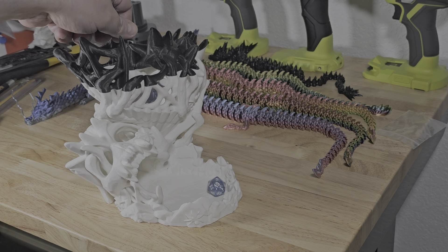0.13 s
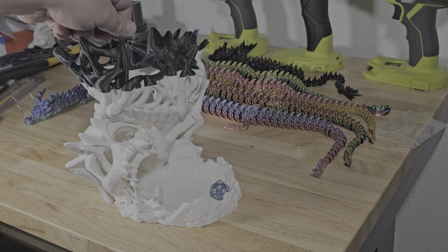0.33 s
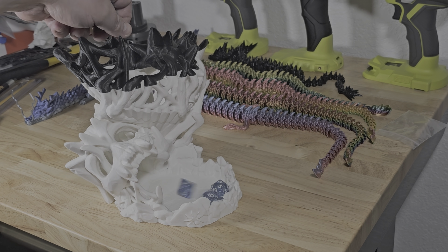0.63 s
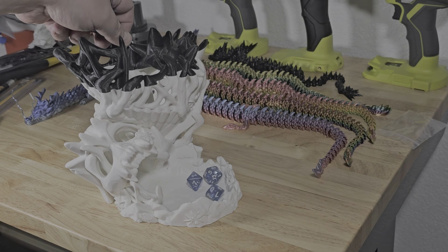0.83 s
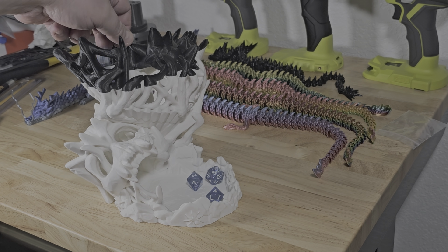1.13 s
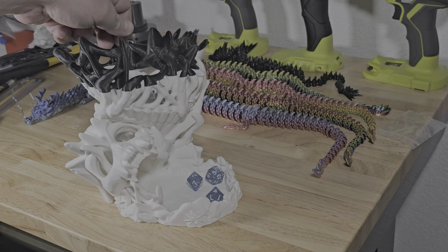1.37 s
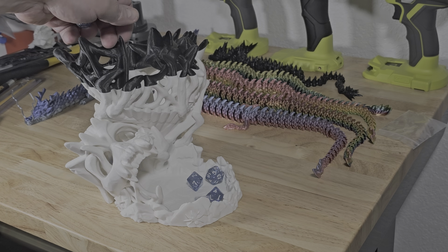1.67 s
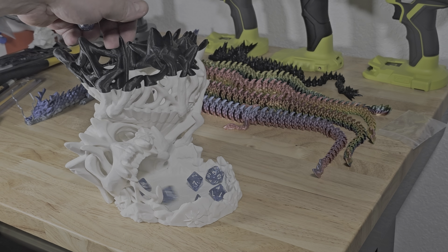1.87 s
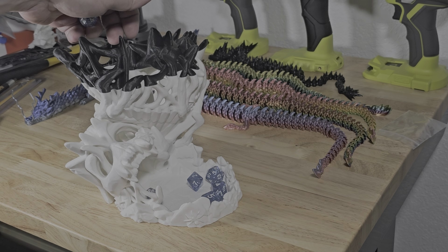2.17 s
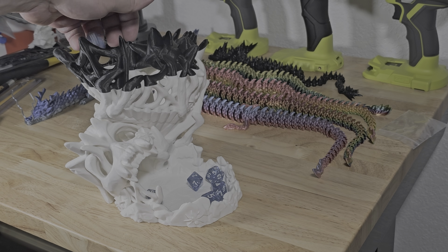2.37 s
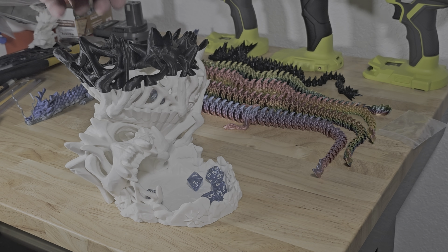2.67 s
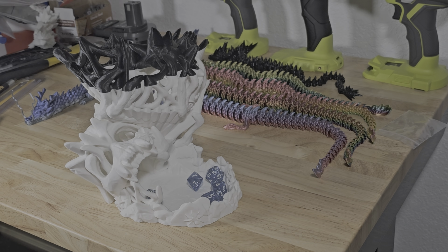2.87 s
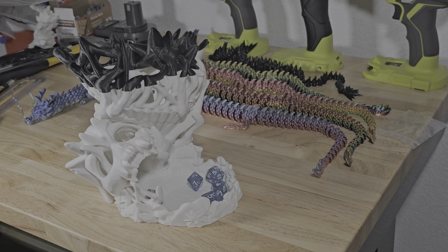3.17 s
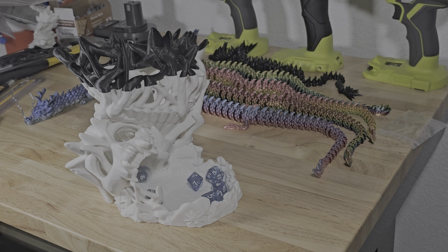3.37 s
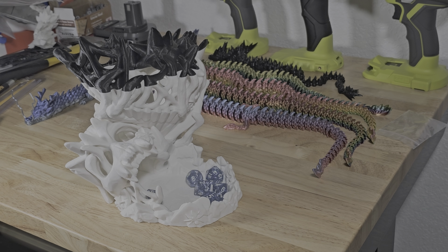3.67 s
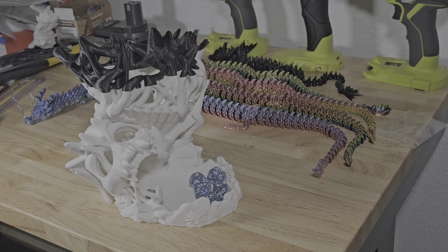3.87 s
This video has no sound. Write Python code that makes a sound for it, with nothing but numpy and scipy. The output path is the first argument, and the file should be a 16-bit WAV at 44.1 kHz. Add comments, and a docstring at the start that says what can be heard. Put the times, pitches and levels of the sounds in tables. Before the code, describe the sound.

Plastic dice tumble through a plastic tower: two dense rattles, then a sparser series of separate knocks that settles in the tray. Close stereo pickup, slight room echo, faint low hum.

```python
"""Dice tumbling down a tower

Hard plastic dice drop into a plastic tower on a workbench, three throws in a row, and roll out into the tray.
Each contact is a click plus short rings of the shell and longer rings of the tower, with a light rebound.
Faint touches and rolling edges are made the same way; heavy landings add a soft thump of the bench top.
Shaped noise and steady tones make a quiet, humming workshop, and decaying noise makes its echoes."""
import sys
import numpy as np
from scipy import signal
from scipy.fft import rfft, irfft
from scipy.io import wavfile
from scipy.ndimage import uniform_filter1d

SR = 44100
rng = np.random.default_rng(int(sys.argv[2]) if len(sys.argv) > 2 else 0)


def output_pcm(signal):
    """Save a mono or channel-first signal as 16-bit PCM at the path in sys.argv[1].

    Samples are clipped to [-1, 1] before scaling.
    """
    pcm = np.clip(np.atleast_2d(signal).T, -1, 1) * 32767
    wavfile.write(sys.argv[1], SR, np.round(pcm).astype(np.int16))


N = 176400

# Quiet air noise of the room, relative spectrum: pitch_hz, level_db (per Hz)
AIR_SPECTRUM = [(20, -37), (52, -7), (90, -14.5), (150, -12), (230, -11.5), (330, -18), (750, -19.5),
                (2200, -30), (2800, -31), (9000, -45), (15500, -57)]
# Low hum and faint high whine: pitch_hz, level_db
HUM_TONES = [(52, -54.5), (222, -59), (15014, -84)]
# Knocks of the dice: start_s, level_db, hollow_lows_db, hard_treble_db,
# ring_hz (of the struck spot), reflection_lag_ms (of the first reflection)
DICE_KNOCKS = [(0.002, -29, -1, -6, 1290, 0.3), (0.046, -28.5, 13, 5, 4320, 0.3),
               (0.1078, -24.5, -6, -11, 1550, 0.15), (0.1184, -19, -13.5, -5.5, 1260, 0.13),
               (0.1288, -18.5, -5, 4.5, 2160, 0.26), (0.1413, -20, -12, -3.5, 3220, 0.2),
               (0.1647, -28, -9, 2, 1320, 0.31), (0.1933, -28, 4, -3, 3100, 0.27),
               (0.2028, -25, -12, -6, 1200, 0.14), (0.2245, -21.5, -8, 0, 2090, 0.29),
               (0.2432, -21, -6.5, -5.5, 1670, 0.22), (0.2636, -22, 1, -14, 4200, 0.61),
               (0.2962, -24, -0.5, -6, 1640, 0.34), (0.3167, -25.5, 1, 2, 2500, 0.24),
               (0.3519, -15, -4, -3, 3700, 0.19), (0.4064, -16, -7, -11, 2570, 0.13),
               (0.429, -22, 3.5, 4, 1860, 0.25), (0.4779, -20, -4.5, 8, 3720, 0.45),
               (0.4896, -22, -0.5, -14, 2500, 0.66), (0.5246, -20, -8, -2, 2570, 0.2),
               (0.5579, -13.5, -2, -1, 3620, 0.17), (0.5743, -19.5, -2, 0, 1720, 0.32),
               (0.6296, -16.5, -2, -7, 2000, 0.12), (0.6468, -23.5, 1, -10, 3670, 0.1),
               (0.6687, -18, 1, -1, 1620, 0.13), (0.698, -30.5, -13, 11, 1450, 0.12),
               (0.7059, -23, 2, -6, 4050, 0.37), (0.718, -22.5, 5, 5.5, 3660, 0.35),
               (0.7342, -22, 2.5, 5, 2147, 0.22), (0.8047, -37, 8, 3, 1270, 0.42),
               (0.8332, -31, 16, 8, 1650, 0.45), (0.978, -28, -17, 8, 2150, 0.22),
               (0.983, -22.5, -10, 6.5, 2810, 0.16), (1.0193, -29, -21, -7.5, 3200, 0.16),
               (1.0741, -29, -24, 17, 4450, 0.28), (1.1267, -34, -3, 7, 4140, 0.28),
               (1.1532, -19, 3.5, 0, 3100, 0.25), (1.1834, -15.5, -21, 5.5, 3170, 0.18),
               (1.188, -16, -2.5, -1, 2700, 0.23), (1.2184, -22.5, -13, 12.5, 6120, 0.23),
               (1.232, -17.5, -24, -3, 3000, 0.64), (1.253, -18.5, 4, -1, 2170, 0.32),
               (1.2834, -25.5, -2, -8, 1260, 0.37), (1.3009, -25, -7, -15, 2160, 0.24),
               (1.3179, -22.5, -23, 5, 1440, 0.18), (1.3454, -23.5, -14, -2, 1260, 0.29),
               (1.3564, -21, -19, 7.5, 1230, 0.093), (1.3716, -22, -14, -13, 2600, 0.15),
               (1.391, -23.5, -8, 14, 3500, 0.15), (1.4083, -22, -3.5, 15, 1800, 0.18),
               (1.4208, -28, -23, 15, 4260, 0.11), (1.427, -21, 3, -6, 1270, 0.1),
               (1.448, -23.5, -18, -6, 3600, 0.3), (1.4687, -19, 0, -4, 2560, 0.22),
               (1.479, -19.5, -13, -7.5, 1270, 0.18), (1.4926, -18, -1, -16, 2600, 0.094),
               (1.5038, -23, 0, 12.5, 1200, 0.32), (1.54, -21.5, 2, 1.5, 2620, 0.19),
               (1.5725, -17.5, 3, -6, 2400, 0.32), (1.5978, -16, -15.5, 0, 1400, 0.13),
               (1.6153, -25, 0, 12, 6360, 0.28), (1.6255, -19, -9, -1, 2520, 0.5),
               (1.6351, -24, -27, -7, 4250, 0.17), (1.6463, -22.5, -5, -4, 1200, 0.52),
               (1.656, -18.5, -5, -4.5, 1740, 0.26), (1.6803, -23, 1, 3, 1770, 0.27),
               (1.6952, -23, -15, -2.5, 1570, 0.12), (1.7113, -15.5, 1, 1.5, 1380, 0.3),
               (1.7408, -30, -11, 7, 1435, 0.11), (1.7776, -22.5, 6.5, 7, 3000, 0.41),
               (1.7825, -17.5, -12, -7, 4980, 0.18), (1.7881, -18, -12, -0.5, 1920, 0.15),
               (1.8334, -29.5, 1, 3, 2120, 0.3), (1.8642, -26, 13, -0.5, 1980, 0.32),
               (1.8792, -24, 4, -9, 3700, 0.28), (1.9334, -20.5, -3, 3.5, 2020, 0.3),
               (1.949, -31, -12, 5, 3580, 0.14), (1.9931, -28, -27, 4, 1680, 0.17),
               (2.0165, -34, -11, 14, 2730, 0.57), (2.4458, -20.5, -4, -10, 2250, 0.42),
               (2.466, -15, -3, -6, 3200, 0.33), (2.4982, -14.5, -2.5, -1, 4260, 0.21),
               (2.5283, -20, 1, -7, 2180, 0.63), (2.604, -20, -7.5, -1, 4170, 0.21),
               (2.619, -30.5, 5, 9.5, 1656, 0.34), (2.6633, -19, -3, -5.5, 2120, 0.28),
               (2.7505, -26, 7.5, 1, 3420, 0.36), (2.7957, -26, 8, 0, 3410, 0.34),
               (2.8461, -17, -1, -8.5, 3900, 0.26), (2.912, -24, 7.5, 4, 1240, 0.39),
               (2.9501, -17, -1.5, -14, 2540, 0.13), (3.0336, -19.5, 7, 8, 1760, 0.37),
               (3.1123, -18, -8, -3, 3680, 0.12), (3.1753, -20, 9, 4.5, 3060, 0.37),
               (3.2337, -28, 1, -9, 1770, 0.37), (3.2685, -25, 7, 12, 3390, 0.39),
               (3.331, -24, 1.5, -4, 2260, 0.24), (3.358, -33.5, 9, 3, 2940, 0.42),
               (3.4261, -35, 15, -1.5, 2050, 0.38), (3.4766, -38, 12, -3, 2040, 0.36),
               (3.4975, -35, 12, -1, 2050, 0.56), (3.523, -30.5, 4.5, 7.5, 6370, 0.11),
               (3.5571, -31.5, 19, 9, 2020, 0.33), (3.5898, -30, -2, -5, 4100, 0.11)]
# Relative spectrum of an average knock: pitch_hz, level_db (per Hz)
KNOCK_SPECTRUM = [(80, -28), (150, -15), (260, -20), (370, -24), (650, -17), (950, -12.5), (1250, -2.5),
                  (2200, -1.5), (3100, -2.5), (4100, -2), (5000, -5.5), (6500, -15), (8000, -16.5),
                  (10000, -21), (12000, -25.5), (15500, -33)]
# Longer rings of the tower, against each other: pitch_hz, level_db
TOWER_RINGS = [(1155, 1), (1272, 4), (1738, 2.5), (1994, 0), (2204, 2.5), (2528, 2), (2935, 1), (3220, -1),
               (3640, 2), (4460, -3), (4774, -2)]
# Typical loudness of the light tumbling over time: time_s, level_db
TUMBLE_LEVELS = [(0, -33), (.3, -35), (.72, -33.5), (.85, -44), (.93, -58), (1.14, -40), (1.23, -31),
                 (1.7, -32), (2.03, -35.5), (2.2, -63)]
# Workshop echo tail by frequency band: pitch_hz, t60_s (time to fall 60 dB), level_db
ROOM_BANDS = [(200, 0.22, -15.5), (650, 0.35, -4.5), (1800, 1, -12.5), (4130, .45, -13),
              (7750, 0.32, -14.5), (15000, 0.3, -21)]
# Heavy landings that reach the bench: start_s, level_db
BENCH_LANDINGS = [(.225, -46), (1.154, -42), (1.254, -45), (2.912, -44), (3.034, -40), (3.113, -46),
                  (3.176, -44)]
# Rings of the bench top, against each other: pitch_hz, level_db
BENCH_RINGS = [(150, 0), (185, -3), (285, -3)]
# Dice rolling out over the tray: middle_s, half_length_s, level_db, tray_ring_hz
TRAY_ROLLS = [(0.795, 0.12, -40, 760), (1.98, 0.17, -43.5, 850), (3.53, .15, -40.5, 2060),
              (3.81, 0.06, -52, 1050)]

SIZE = 8192  # samples in one contact sound
FADE_S = .05
TOP_HZ = 16000
AIR_DB, AIR_WIDE_HZ, HUM_WAVER = -47.5, 490, 0.39
SHELL_T60_S, SHELL_DAMPING = 0.05, 0.4  # ring time at 2 kHz; power by which it shortens with frequency
SHELL_RISE_S, MODE_SCATTER_DB = .0004, 3  # the blow spreads; each spot favours other modes
TOWER_T60_S, TOWER_DB = 0.11, -8
CLICK_DB, CLICK_PER_TREBLE = -9, .6  # harder contacts are more click than ring
RING_DB, RING_PER_TREBLE, RING_WIDTH_HZ = 9, .3, 110  # extra ring of the struck spot
REFLECTION, REFLECTION_PER_TREBLE_DB = 0.43, 0.04
REBOUND_SCALE_S, REBOUND_DB = .005, -12
LEFT_LEAD_S, LIKENESS = 0.00014, 0.31  # likeness: share of energy common to both ears
PAN_DB = 0.93  # how much louder the left ear is
TUMBLES_PER_S, TUMBLE_SCATTER_DB, TUMBLE_LOW_DB, TUMBLE_TREBLE_DB = 70, 2, 2.5, -2
EARLY_DB, EARLY_T60_S, WALL_S = -13, 0.091, .007
BENCH_T60_S, BENCH_RISE_S = .2, .005
ROLL_EDGES_PER_S, TRAY_LOW_DB, TRAY_TREBLE_DB = 160, 8, -4
ROLL_FADE_DB, ROLL_SCATTER_DB = 8.5, 2.5
NARROW_HZ = 330


def undb(db):
    """Turn decibels into a plain gain."""
    return 10 ** (np.asarray(db) / 20)


def unit(x):
    """Scale to an energy of one per channel, averaged over the channels."""
    return x / np.sqrt(np.mean(np.sum(x ** 2, axis=-1)))


def curve(hz, points, column=1):
    """Join the points of a column by straight lines on a log-frequency axis."""
    p = np.array(points, float)
    return np.interp(np.log(hz + 1e-9), np.log(p[:, 0]), p[:, column])


def room_tone():
    """Soft air noise, alike at both ears in the bass, over a wavering hum and whine."""
    f, t = np.fft.rfftfreq(N, 1 / SR), np.arange(N) / SR
    mid, side = rfft(rng.standard_normal((2, N))) * undb(curve(f, AIR_SPECTRUM))
    wide = side * f / np.hypot(f, AIR_WIDE_HZ)
    air = irfft(mid + np.array([[1], [-1]]) * wide, N)
    hum = 0
    for hz, db in HUM_TONES:
        # a narrow band of noise around the steady tone makes it waver
        near = 1 / (1 + ((f - hz) / 5) ** 2)
        waver = unit(irfft(rfft(rng.standard_normal(N)) * near, N)) * np.sqrt(N)
        steady = np.sqrt(2) * np.sin(2 * np.pi * hz * t)
        hum = hum + undb(db) * (steady + HUM_WAVER * waver)
    return undb(AIR_DB) * np.sqrt(N) * unit(air) + hum


def add(out, start_s, sound):
    """Mix a sound in at its time, with its end faded."""
    i = max(int(start_s * SR), 0)
    fade = np.clip((SIZE - np.arange(SIZE)) / (FADE_S * SR) - 1, 0, 1)
    part = out[:, i:i + SIZE]
    part += (sound * fade)[:, :part.shape[1]]


def causal(db):
    """Filter with the given gains whose energy comes as early as possible (minimum phase)."""
    c = irfft(np.log(undb(db)))
    c[1:SIZE // 2] *= 2
    c[SIZE // 2 + 1:] = 0
    return np.exp(rfft(c))


def rings(hz, t60):
    """Decaying complex oscillations, one row per mode (a pitch at which a body rings)."""
    t = np.arange(SIZE) / SR
    turn_and_decay = 2j * np.pi * hz - np.log(1000) / t60
    return np.exp(turn_and_decay[:, None] * t).astype(np.complex64)


def ears(x):
    """The same sound at both ears, a little later at the right."""
    lag = np.array([[0], [LEFT_LEAD_S]])
    return irfft(rfft(x) * np.exp(-2j * np.pi * np.fft.rfftfreq(SIZE, 1 / SR) * lag))


def strike(modes, gains, count):
    """Each contact meets the modes in its own phases and strengths, partly alike at both ears."""
    # three versions of each contact: one shared by the ears, one for each ear alone
    phase = np.exp(2j * np.pi * rng.random((count * 3, len(modes))))
    scatter = undb(MODE_SCATTER_DB * rng.standard_normal((count, len(modes))))
    gains = gains * np.repeat(scatter, 3, axis=0)
    x = ((phase * gains).astype(np.complex64) @ modes).real.reshape(count, 3, SIZE)
    return np.sqrt(LIKENESS) * ears(x[:, :1]) + np.sqrt(1 - LIKENESS) * x[:, 1:]


def even(x, size=151):
    """Spectra with their broad humps ironed out, so that mainly fine resonances remain."""
    spectrum = rfft(x)
    power = np.mean(abs(spectrum) ** 2, axis=1, keepdims=True)
    power = uniform_filter1d(power, size, axis=-1)
    return spectrum / np.sqrt(power + power.mean(axis=-1, keepdims=True) / 20)


def shell_rings(contact_count, mode_count=300):
    """Spectra of the shell's crowded short modes, which die sooner at high pitch."""
    t = np.arange(SIZE) / SR
    hz = (np.arange(mode_count) + 1 + rng.random(mode_count)) * TOP_HZ / mode_count
    t60 = SHELL_T60_S * (np.maximum(hz, 1000) / 2000) ** -SHELL_DAMPING
    ringing = strike(rings(hz, t60), t60 ** -.5, contact_count)
    return even(ringing * (1 - np.exp(-t / SHELL_RISE_S)))


def tower_rings(contact_count):
    """Spectra of the few tower modes that last longer than the shell's."""
    hz, db = np.array(TOWER_RINGS, float).T
    return rfft(strike(rings(hz, TOWER_T60_S), undb(db), contact_count))


def clicks(contact_count):
    """Spectra of the contact itself: one sharp impulse, pushing or pulling at random."""
    sign = rng.choice([-1, 1], (contact_count, 1, 1))
    return rfft(ears(sign * (np.arange(SIZE) == 0)))


def contacts(rows):
    """Click, shell and tower rings coloured by the struck spot, then a light rebound."""
    f = np.fft.rfftfreq(SIZE, 1 / SR)
    shell, tower, click = (make(len(rows)) for make in (shell_rings, tower_rings, clicks))
    # where the lows and treble settings act: pitch_hz, share
    low = curve(f, [(427, .5), (1200, 1), (3000, 0)])
    treble = curve(f, [(3560, 0), (7850, 1)])
    base, out = curve(f, KNOCK_SPECTRUM), np.zeros((2, N))
    loud_gain = np.sqrt(.012 * SR)  # levels refer to energy spread over 12 ms
    # a second corner of the die lands just after the first
    rebound_s = REBOUND_SCALE_S * (.5 + rng.exponential(size=len(rows)))
    for k, (s, db, low_db, treble_db, ring_hz, lag_ms) in enumerate(rows):
        ring_db = RING_DB - RING_PER_TREBLE * max(treble_db, 0)
        spot = ring_db / (1 + ((f - ring_hz) / RING_WIDTH_HZ) ** 2)
        colour = causal(base + low_db * low + treble_db * treble + spot)
        mirror = np.clip(REFLECTION + REFLECTION_PER_TREBLE_DB * treble_db, 0, .85)
        colour = colour * (1 + mirror * np.exp(-2j * np.pi * f * lag_ms / 1000))
        # the rebound borrows the shell ring of the row before
        sources = (shell[k], shell[k - 1], tower[k], click[k])
        body, rebound, lasting, tick = (unit(irfft(x * colour)) for x in sources)
        tick_gain = undb(CLICK_DB + CLICK_PER_TREBLE * treble_db)
        knock = unit(body + undb(TOWER_DB) * lasting + tick_gain * tick)
        add(out, s, undb(db) * loud_gain * knock)
        add(out, s + rebound_s[k], undb(db + REBOUND_DB) * loud_gain * rebound)
    return out


def tumbling():
    """Rows for the many light touches of tumbling dice, at random moments."""
    count = int(TUMBLES_PER_S * N / SR)
    u, g = rng.random((count, 3)).T, rng.standard_normal((count, 3)).T
    s = (np.arange(count) + 2 * u[0]) / TUMBLES_PER_S
    db = np.interp(s, *np.array(TUMBLE_LEVELS).T) + TUMBLE_SCATTER_DB * g[0]
    low_db, treble_db = TUMBLE_LOW_DB + 3 * g[1], TUMBLE_TREBLE_DB + 4 * g[2]
    ring_hz, lag_ms = 1200 + 3000 * u[1], .15 + .4 * u[2]
    rows = np.c_[s, db, low_db, treble_db, ring_hz, lag_ms]
    return rows[db > -58]  # leave out the faintest


def workshop(x):
    """Quick echoes from the bench and near walls and a diffuse tail, both as decaying noise."""
    t, f = np.arange(SR) / SR, np.fft.rfftfreq(SR, 1 / SR)
    noise, tail = rfft(rng.standard_normal((2, SR))), 0
    arrive = np.clip(t / WALL_S - 1, 0, 1)
    for k, (hz, t60, db) in enumerate(ROOM_BANDS):
        # this band fades into its neighbours
        band = curve(f, [(row[0], j == k) for j, row in enumerate(ROOM_BANDS)])
        decay = unit(arrive * np.exp(-np.log(1000) * t / t60))
        tail = tail + undb(db) * irfft(noise * band) * decay
    early_decay = (t > WALL_S) * np.exp(-np.log(1000) * t / EARLY_T60_S)
    early = unit(rng.standard_normal((2, SR)) * early_decay)
    return signal.fftconvolve(x, tail + undb(EARLY_DB) * early, axes=1)[:, :N]


def bench():
    """The wooden top answers heavy landings with a short, soft thump of a few low modes."""
    hz, db = np.array(BENCH_RINGS, float).T
    rise = 1 - np.exp(-np.arange(SIZE) / SR / BENCH_RISE_S)
    thump = rise * (undb(db) @ rings(hz, BENCH_T60_S).imag)
    out = np.zeros((2, N))
    for s, level_db in BENCH_LANDINGS:
        add(out, s, undb(level_db) * np.array([thump, thump]))
    return out


def rolling():
    """Rows for the edges of rolling dice, which patter unevenly on the tray, swell and die away."""
    rows = []
    for middle, half, db, tray_hz in TRAY_ROLLS:
        count = 80
        u, g = rng.random((count, 2)).T, rng.standard_normal((count, 3)).T
        s = (np.arange(count) - count / 2 + u[0]) / ROLL_EDGES_PER_S
        level_db = db - ROLL_FADE_DB * (s / half) ** 2 + ROLL_SCATTER_DB * g[0]
        low_db = np.full(count, TRAY_LOW_DB)
        treble_db = TRAY_TREBLE_DB + ROLL_SCATTER_DB * g[1]
        ring_hz, lag_ms = tray_hz + RING_WIDTH_HZ * g[2], u[1] / 2
        edges = np.c_[middle + s, level_db, low_db, treble_db, ring_hz, lag_ms]
        rows.append(edges[abs(s) < half])
    return np.vstack(rows)


def narrow_bass(x):
    """Long waves reach both ears alike, so the difference between the ears loses its bass."""
    f = np.fft.rfftfreq(N, 1 / SR)
    side = irfft(rfft(x[0] - x[1]) / 2 * 1j * f / (1j * f + NARROW_HZ), N)
    return x.mean(axis=0) + np.array([[1], [-1]]) * side


def scene():
    """Dice in the tower and tray, thumps in the bench, the room's answer and its quiet tone."""
    tone = room_tone()
    rows = np.vstack([np.array(DICE_KNOCKS), tumbling(), rolling()])
    pan = undb(np.array([[PAN_DB], [-PAN_DB]]) / 2)
    dice = contacts(rows) * pan + bench()
    return narrow_bass(dice + workshop(dice)) + tone


def record(dry):
    """The recorder cuts the top with a steep low-pass filter."""
    low_pass = signal.ellip(8, .2, 70, TOP_HZ, fs=SR, output="sos")
    return signal.sosfilt(low_pass, dry)


dry = scene()
out = record(dry)
output_pcm(out)
```